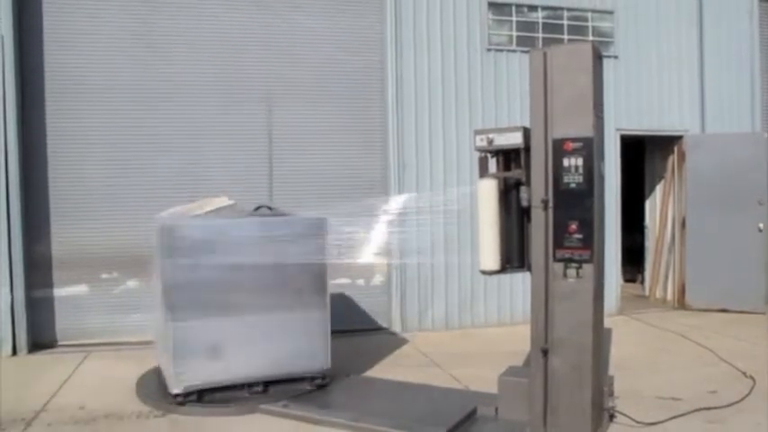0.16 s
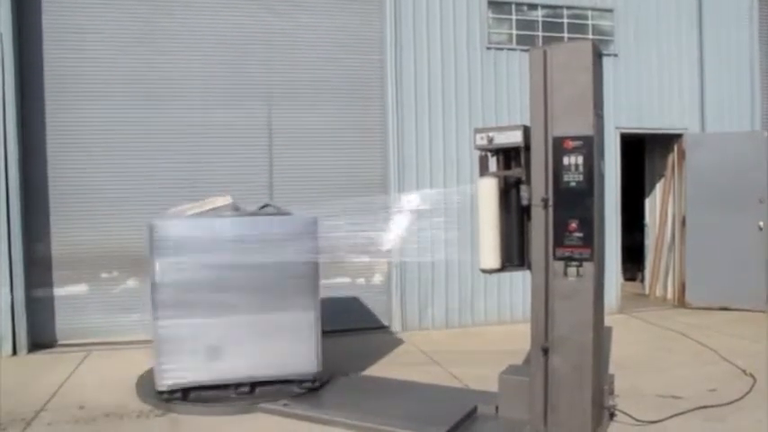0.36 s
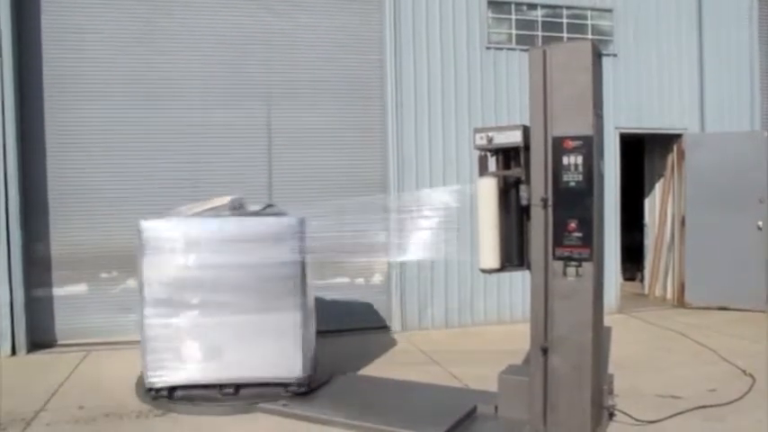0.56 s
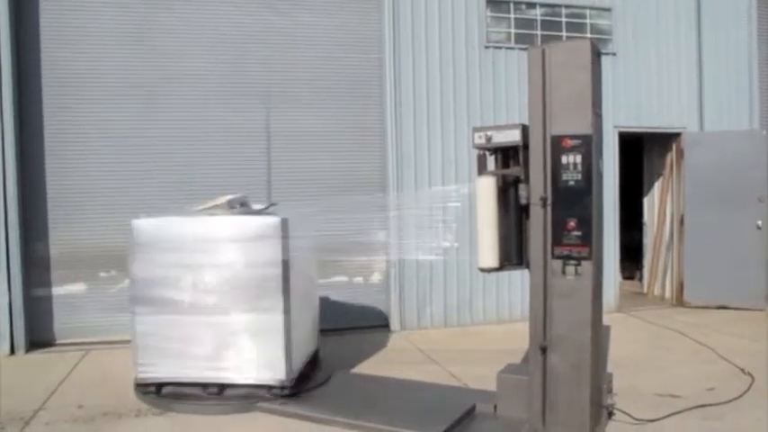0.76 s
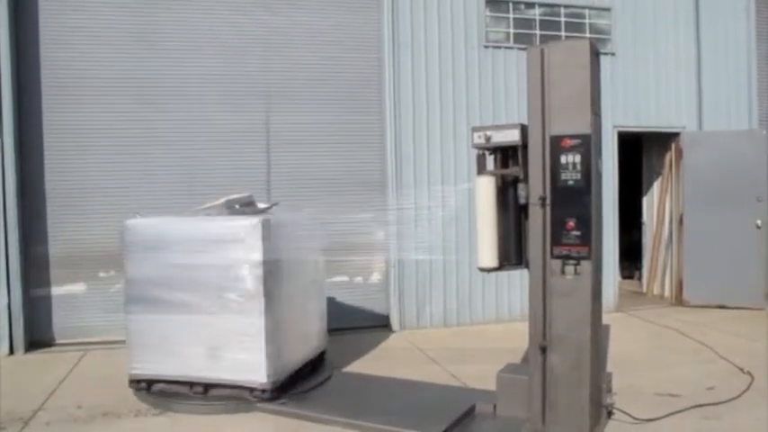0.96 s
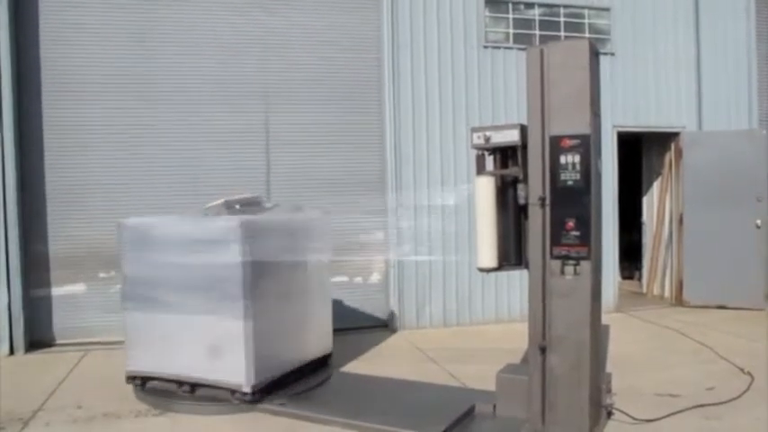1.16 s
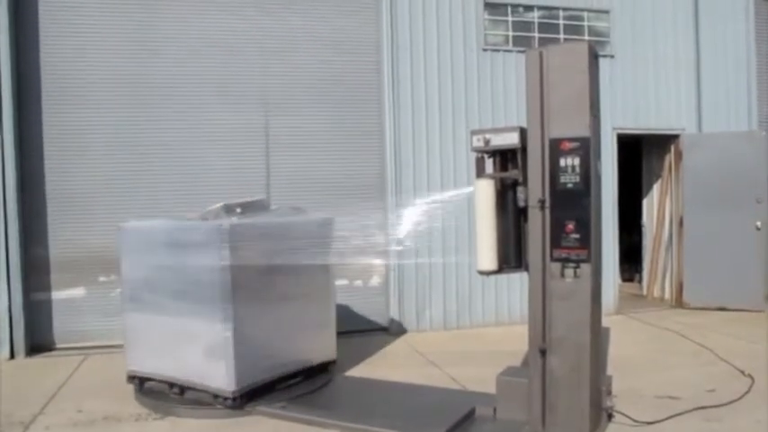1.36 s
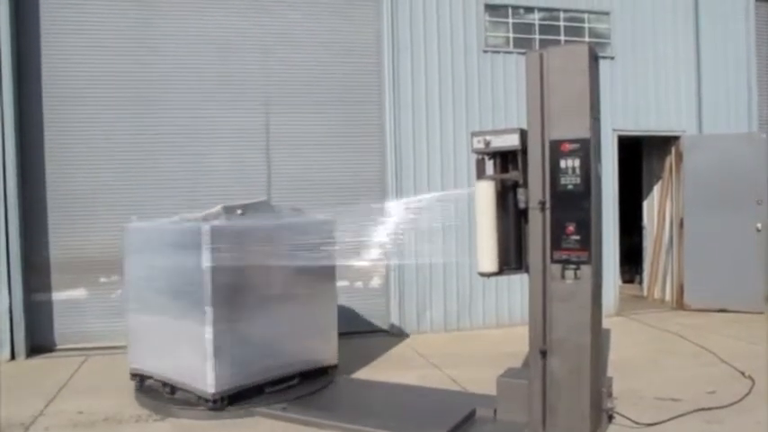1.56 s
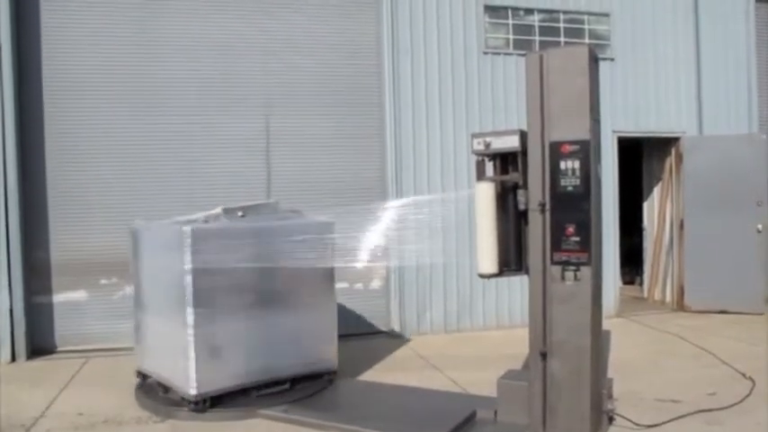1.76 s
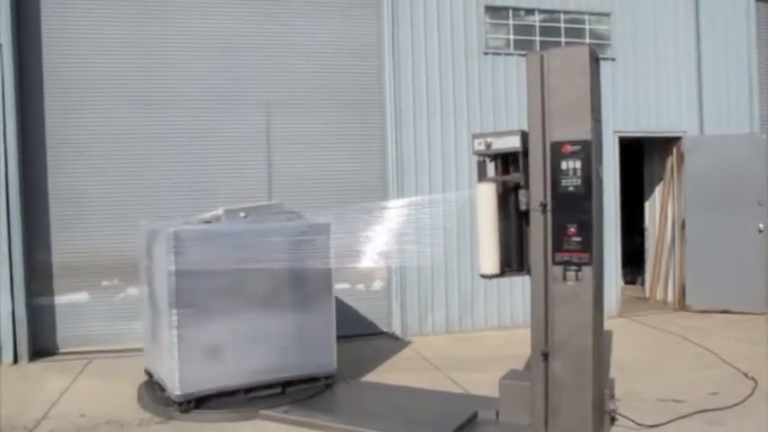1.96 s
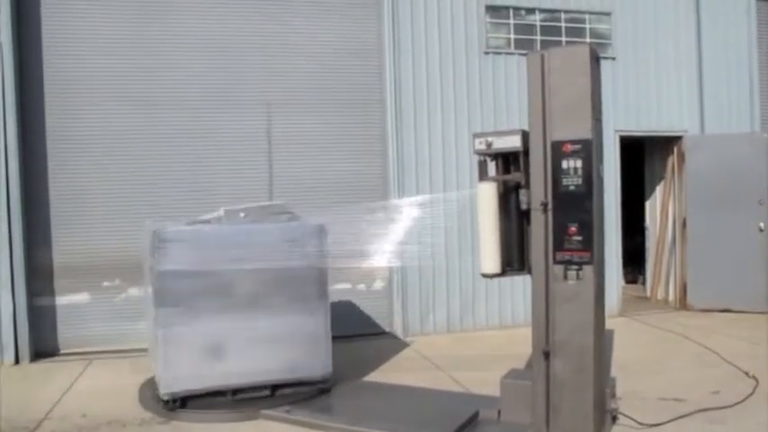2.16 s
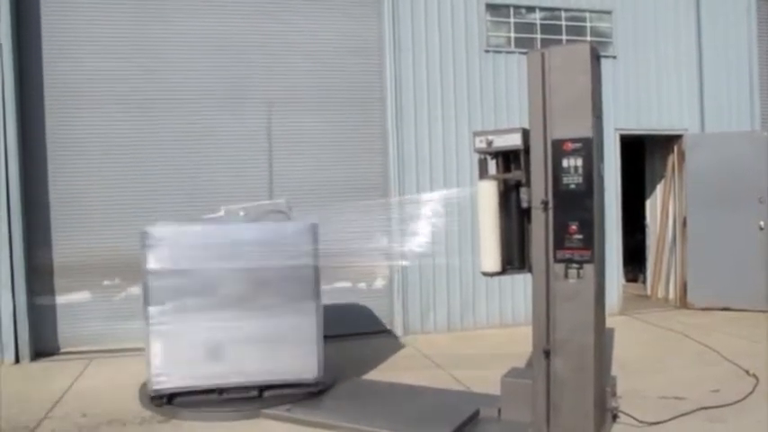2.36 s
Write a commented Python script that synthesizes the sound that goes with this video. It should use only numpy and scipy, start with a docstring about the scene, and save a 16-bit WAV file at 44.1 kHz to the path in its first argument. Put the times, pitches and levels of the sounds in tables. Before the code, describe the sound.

Deep electric drive hum with faint buzz and gear whine under continuous film hiss. Irregular crackle bursts come throughout, dull frame clatter grows busier after the start, and the hum becomes fuller midway, in an open yard beside a metal wall.

```python
"""The drive of a turntable machine hums as it wraps a pallet in plastic film, and swells halfway through.
It is a stack of shaft orders, over steady mains and gear tones; filtered noise is the table's rumble.
Noise bursts through frame resonances make the clatter; random tiny snaps make the film hiss and crackle.
Film and clatter scatter back from a metal wall outdoors, and the film roll squeals faintly once."""
import sys
import numpy as np
from scipy import signal
from scipy.fft import rfft, irfft, next_fast_len
from scipy.io import wavfile
from scipy.ndimage import map_coordinates

SR = 44100
rng = np.random.default_rng(int(sys.argv[2]) if len(sys.argv) > 2 else 0)


def int16_out(signal):
    """Quantize to a 16-bit WAV file."""
    q = np.round(np.clip(np.atleast_2d(signal).T, -1, 1) * 32767)
    wavfile.write(sys.argv[1], SR, q.astype(np.int16))


N = 111573  # length in samples

# Echo off the wall and the ground: level, time to fall 60 dB, gap before the first return.
WALL_DB, WALL_T60_S, WALL_DELAY_S = -10.5, 0.067, 0.0074

# Steady tones of the mains and the gearing. Each row: frequency in Hz, level in dB, unsteady share.
STEADY_TONES = [(102.3, -39.5, .6), (120, -39.5, .25), (236, -46, .9), (480, -47, .25), (561, -58, .9),
                (2665, -69, .6), (2932, -66.5, .3), (3655, -67.5, .5), (5119.4, -71, .2)]
TONE_FLUTTER_KNOTS_PER_S = 14

# Faint squeal of the film roll. One row: start in seconds, length in seconds, pitch in Hz, peak sine level in dB.
ROLL_SQUEAL = (1.78, .27, 5120, -57)

# Colour of the rolling table and the open air. Each row: frequency in Hz, relative level in dB.
RUMBLE_COLOUR = [(12, -3.5), (25, -2), (37, 4.5), (54, -9.5), (78, -4.5), (105, -9), (125, -10.5),
                 (142, -11.5), (175, -17.5), (195, -18), (215, -12.5), (235, -12.5), (265, -18.5),
                 (320, -21.5), (400, -46), (700, -60)]
RUMBLE_DB = -29.5
# Colour of the grinding rollers. Each row: frequency in Hz, relative level in dB.
GRIND_COLOUR = [(150, 1), (300, -0.5), (345, 3), (380, -2.5), (440, 0), (490, 4.5), (535, -3), (570, -1),
                (650, -2), (830, 0.5), (980, -5.5), (1400, -5.5), (2200, -16), (3400, -22), (4200, -35.5),
                (9000, -36), (14000, -71)]
# Loudness of the grinding rollers. Each row: time in seconds, level in dB.
GRIND_LEVEL = [(0, -39), (.4, -38.5), (.6, -39), (.9, -39.5), (1.17, -39.5), (1.3, -38.5), (1.7, -39),
               (2.2, -38), (2.53, -41)]

# Clatter of the table. Each row: start in seconds, then the drive into the low, middle and high rings in dB.
CLATTER_HITS = [(.385, -41, -55, -51), (0.654, -42, -52, -54), (.785, -45, -48, -52),
                (0.827, -36.5, -44, -54), (0.994, -38, -43.5, -48), (1.136, -40, -39, -41.5),
                (1.17, -52, -41.5, -63), (1.192, -42, -45, -55), (1.368, -35.5, -47, -45),
                (1.616, -33.5, -43, -39.5), (1.812, -33, -41.5, -39.5), (1.958, -39, -45.5, -38.5),
                (2.106, -36, -48, -51), (2.214, -44.5, -46, -46), (2.27, -43, -50, -41)]
HIT_RISE_S, HIT_DECAY_S = 0.0043, 0.019
# Steel frame, low, middle and high resonances. Each row: centre in Hz, width in Hz, relative level in dB.
FRAME_LOW_RINGS = [(836, 54, 3), (876, 26, -9.5)]
FRAME_MID_RINGS = [(1175, 74, -1), (1310, 120, 3), (1447, 65, 1), (1710, 150, -7)]
FRAME_HIGH_RINGS = [(1800, 100, -4), (2400, 45, 1), (2508, 35, -2), (2700, 70, -5), (2950, 60, -4),
                    (3225, 40, 1), (3540, 50, -5), (3670, 50, -5)]
FRAME_TOP_HZ = 4700

# Film peeling off the roll. Each row: time in seconds, level in dB.
PEEL_LEVEL = [(0, -45), (.3, -48), (.52, -50.5), (.9, -47.5), (1.1, -48), (1.3, -50.5), (1.42, -48),
              (1.8, -50), (2.05, -47.5), (2.3, -47.5), (2.53, -51)]
# Colour of the peeling hiss. Each row: frequency in Hz, relative level in dB.
PEEL_COLOUR = [(500, -14), (1500, -3), (2800, 6.5), (4200, 3), (6300, 4), (8200, 3.5), (9200, -6.5),
               (10200, -14), (12000, -20), (15500, -42)]
# Resonances of the film carriage. Each row: centre in Hz, width in Hz, relative level in dB.
CARRIAGE_RINGS = [(2520, 17, 2), (2666, 43, 7), (2980, 48, -21), (2850, 100, -6), (3180, 100, 1),
                  (3377, 45, -4.5), (3644, 220, 2.5), (4625, 88, 3), (5340, 96, -10.5), (5980, 69, -6)]
CARRIAGE_DB, CARRIAGE_TOP_HZ = -54, 7000
# Bursts of crackle. Each row: start in seconds, level in dB, rise in seconds, decay in seconds.
CRACKLE_BURSTS = [(0.067, -47, 0.018, 0.035), (.11, -45, 0.0056, 0.013), (.253, -41.5, .002, 0.037),
                  (.337, -42, 0.0092, 0.046), (0.376, -42.5, .003, 0.05), (.565, -45.5, 0.016, 0.033),
                  (.75, -38.5, 0.0057, 0.018), (.975, -41.5, 0.0087, 0.018), (1.072, -46, .002, 0.015),
                  (1.134, -52, .002, 0.018), (1.185, -43.5, 0.0016, 0.01), (1.51, -47.5, 0.0065, 0.029),
                  (2.085, -36, .001, 0.025), (2.178, -44.5, 0.003, 0.054), (2.268, -45, 0.0053, .022),
                  (2.342, -43.5, 0.0053, 0.038), (2.435, -47, 0.0053, 0.039)]
# Colour of the crackle. Each row: frequency in Hz, relative level in dB.
CRACKLE_COLOUR = [(800, -19), (2000, -5), (3000, 4.5), (4500, -1), (6300, 2.5), (8300, 3.5), (9400, -4),
                  (10400, -16.5), (12500, -20), (15500, -38)]
PEEL_GRAINS_PER_S, CRACKLE_GRAINS_PER_S, GRAIN_SPREAD_DB = 3500, 4000, 1.5

# The drive. Each row: time in seconds, shaft speed in Hz, level in dB before the order balance.
DRIVE_CURVE = [(0, 81.94, -30.5), (.5, 82.04, -33.5), (1.15, 82.55, -32), (1.42, 82.55, -25),
               (1.8, 82.27, -23), (2.1, 82.78, -22.5), (2.53, 82.5, -23.5)]
# Balance of its orders. Each row: multiple of shaft speed, relative level in dB, level waver in dB.
SHAFT_ORDERS = [(1, -1, 0.84), (2, -7, 0.7), (3, -14, -0.1), (4, -29, 2), (5, -33.5, -0.5)]
SPEED_WAVER = 0.0031  # share of the shaft speed

# Treble loss of the microphone. Each row: frequency in Hz, gain in dB.
MIC_TREBLE = [(10500, 0), (12500, -4), (15500, -11)]
MIC_TOP_HZ = 15700


def amp(db):
    """Decibels to linear gain."""
    return 10 ** (np.asarray(db) / 20)


def unit(x):
    """x scaled to rms 1."""
    return x / np.sqrt(np.mean(x ** 2) + 1e-20)


def clock():
    """Time of every sample in seconds."""
    return np.arange(N) / SR


def curves(rows):
    """One value per sample for each column after the time."""
    times, *columns = np.transpose(rows)
    return [np.interp(clock(), times, column) for column in columns]


def wobble(rate):
    """A smooth random curve, rate knots a second."""
    return map_coordinates(rng.standard_normal(400), [clock() * rate + 2], mode="wrap")


def filtered(x, response):
    """x times a complex response of frequency."""
    size = next_fast_len(N + SR // 2)  # padded so that tails do not wrap round
    spectrum = rfft(x, size) * response(np.fft.rfftfreq(size, 1 / SR))
    return irfft(spectrum, size)[:N]


def coloured(x, points):
    """x shaped by (Hz, dB) points along log frequency, at rms 1."""
    hz, db = np.transpose(points)
    return unit(filtered(x, lambda f: amp(np.interp(np.log(f + 1), np.log(hz + 1), db))))


def ringing(x, modes, top_hz):
    """x through parallel resonances, dull above top_hz; keeps the power of white noise."""
    def response(f):
        h = sum(amp(db) * 1j * f * width / (centre ** 2 - f * f + 1j * f * width)
                for centre, width, db in modes)
        h = h / (1 + (f / top_hz) ** 6)
        return h / np.sqrt(np.mean(abs(h) ** 2))
    return filtered(x, response)


def grains(rate):
    """Tiny snaps of uneven size and random sign at random moments, at rms 1."""
    size = amp(GRAIN_SPREAD_DB * np.clip(rng.standard_normal(N), -2, 2))
    sign = np.sign(rng.standard_normal(N))
    happens = rng.random(N) < rate / SR
    return unit(size * sign * happens)


def burst(start, rise, decay):
    """A straight rise and an exponential fall."""
    t = clock() - start
    return np.clip(t / rise, 0, 1) * np.exp(-np.maximum(t - rise, 0) / decay)


def wall(x):
    """The wall and the ground scatter sound back as a short, decaying noise tail."""
    t = np.arange(SR // 3) / SR
    tail = rng.standard_normal(len(t)) * amp(-60 * t / WALL_T60_S) * (t > WALL_DELAY_S)
    return signal.fftconvolve(x, tail / np.linalg.norm(tail))[:N]


def tones():
    """Mains buzz and gear whine: each line flutters a little in level and phase."""
    out = np.zeros(N)
    for hz, db, unsteady in STEADY_TONES:
        drift = wobble(TONE_FLUTTER_KNOTS_PER_S) + 1j * wobble(TONE_FLUTTER_KNOTS_PER_S)
        line = np.exp(2j * np.pi * (hz * clock() + rng.random()))
        out += amp(db) * unit(np.real((1 + unsteady * drift) * line))
    return out


def squeal():
    """The film roll squeals: a thin tone of wavering phase that swells and fades."""
    start, length, hz, db = ROLL_SQUEAL
    swell = np.sin(np.pi * np.clip((clock() - start) / length, 0, 1))
    return amp(db) * swell * np.sin(2 * np.pi * hz * clock() + 0.3 * wobble(30))


def turntable():
    """The loaded table rumbles and grinds on its rollers, two bands of shaped noise."""
    grind_db, = curves(GRIND_LEVEL)
    grind_db = grind_db + 0.74 * wobble(27.81)
    rumble = amp(RUMBLE_DB) * coloured(rng.standard_normal(N), RUMBLE_COLOUR)
    grind = amp(grind_db) * coloured(rng.standard_normal(N), GRIND_COLOUR)
    return rumble + grind


def clatter():
    """Short noisy rattles ring the steel frame, each with its own mix of low, middle and high rings."""
    starts, *levels_db = np.transpose(CLATTER_HITS)
    shapes = np.array([burst(start, HIT_RISE_S, HIT_DECAY_S) for start in starts])
    out = np.zeros(N)
    for db, modes in zip(levels_db, (FRAME_LOW_RINGS, FRAME_MID_RINGS, FRAME_HIGH_RINGS)):
        rattle = amp(db) @ shapes * rng.standard_normal(N)
        out += ringing(rattle, modes, FRAME_TOP_HZ)
    return out


def film():
    """Film peels in a fine crackle that rings its carriage, and lets go in louder bursts."""
    peel_db, = curves(PEEL_LEVEL)
    peel_db = peel_db + 1.1 * wobble(26)
    peel = amp(peel_db) * coloured(grains(PEEL_GRAINS_PER_S), PEEL_COLOUR)
    # the carriage follows the ups and downs of the peel around its own level
    carriage_db = CARRIAGE_DB + peel_db - peel_db.mean()
    carriage = ringing(amp(carriage_db) * grains(PEEL_GRAINS_PER_S), CARRIAGE_RINGS, CARRIAGE_TOP_HZ)
    release = sum(amp(db) * burst(s, rise, decay) for s, db, rise, decay in CRACKLE_BURSTS)
    crackle = release * coloured(grains(CRACKLE_GRAINS_PER_S), CRACKLE_COLOUR)
    return peel + carriage + crackle


def drive():
    """The hum: whole multiples of a wavering shaft speed that swell together."""
    hz, level_db = curves(DRIVE_CURVE)
    turn = 2 * np.pi * np.cumsum(hz * (1 + SPEED_WAVER * wobble(7.64))) / SR
    out = np.zeros(N)
    for multiple, db, waver_db in SHAFT_ORDERS:
        gain = amp(level_db + db + waver_db * wobble(12))
        out += gain * np.sin(round(multiple) * turn + 2 * np.pi * rng.random())
    return out * np.sqrt(2)  # levels are rms


def scene():
    """The whole machine, with the wall answering only the film and the clatter."""
    sharp = film() + clatter()
    echo = amp(WALL_DB) * wall(sharp)
    return (tones() + squeal() + turntable() + drive() + sharp + echo)[None]


def record(dry):
    """The microphone dulls the highest treble and passes nothing from its band limit up."""
    hz, db = np.transpose(MIC_TREBLE)
    return filtered(dry[0], lambda f: amp(np.interp(f, hz, db)) * (f < MIC_TOP_HZ))[None]


dry = scene()
out = record(dry)
int16_out(out)
```